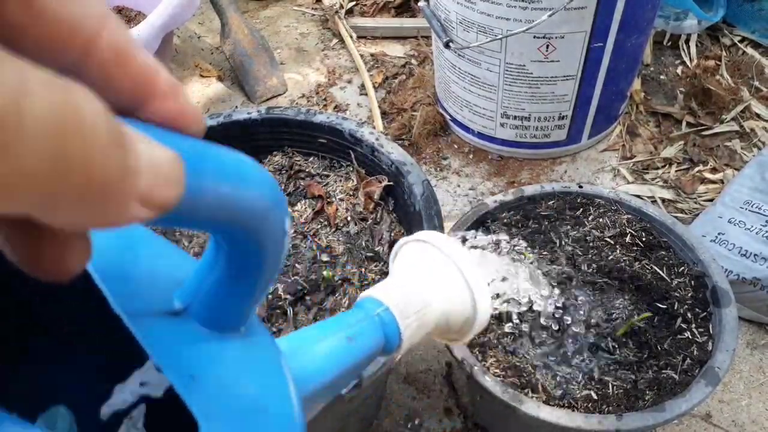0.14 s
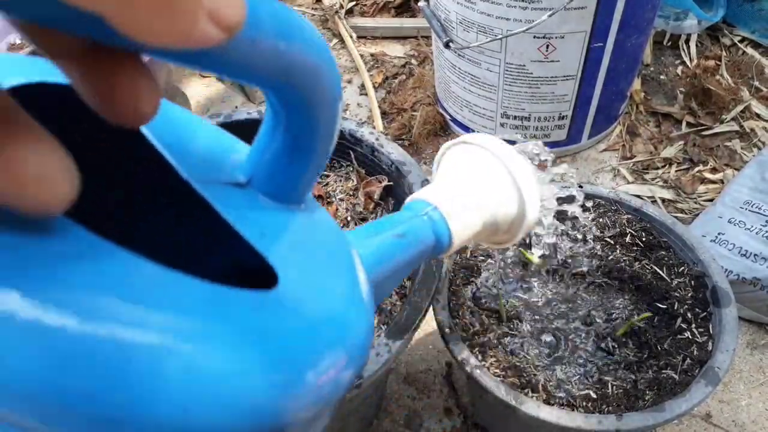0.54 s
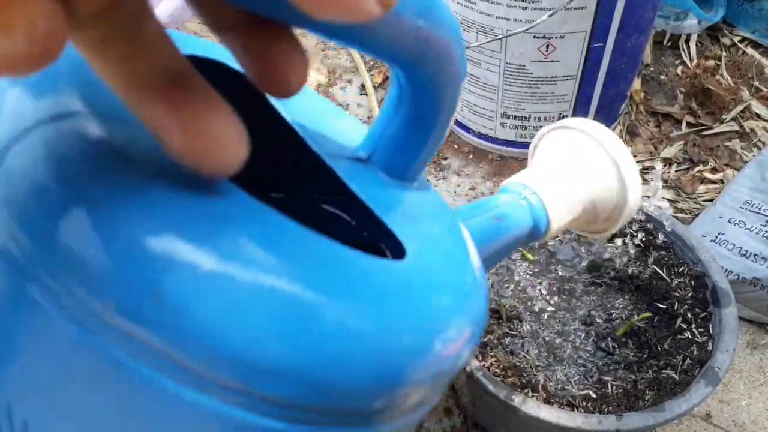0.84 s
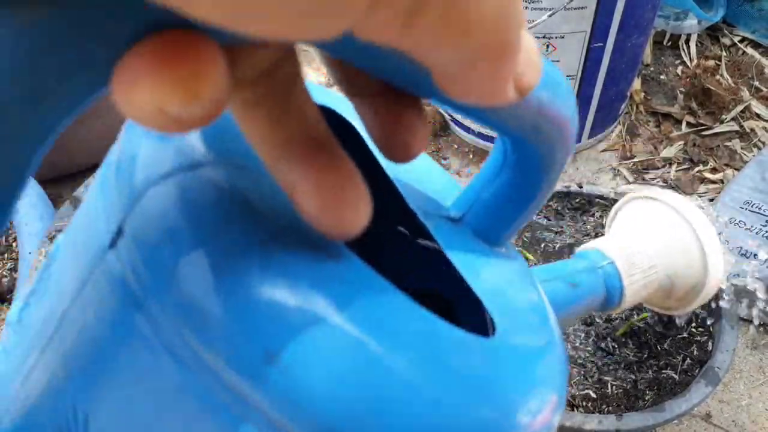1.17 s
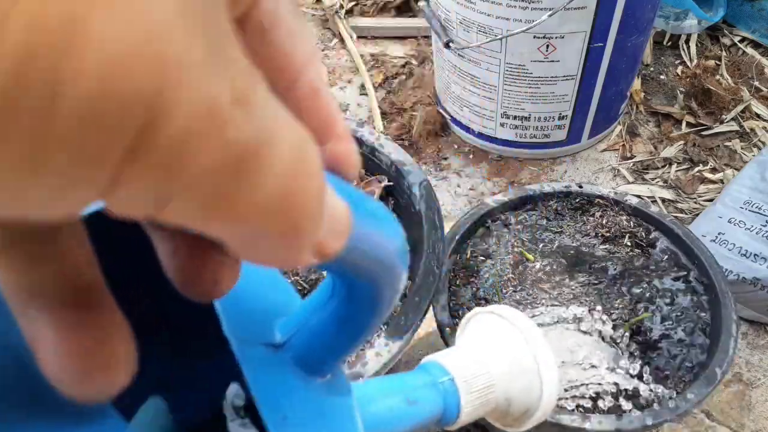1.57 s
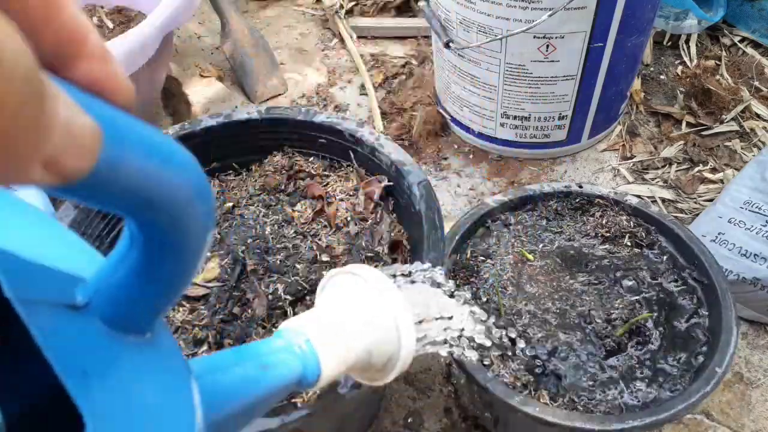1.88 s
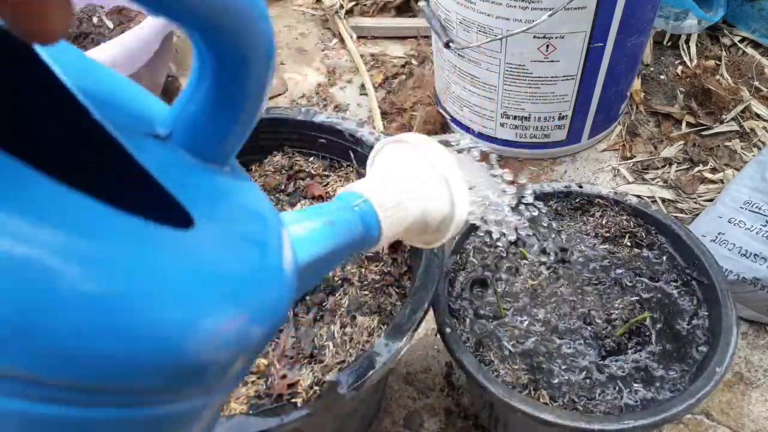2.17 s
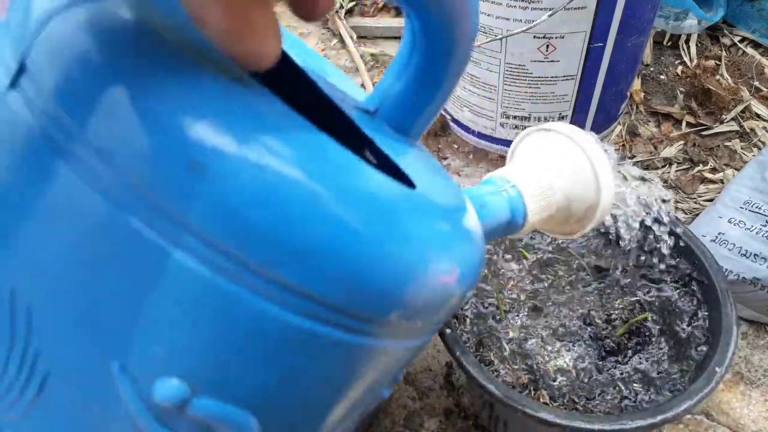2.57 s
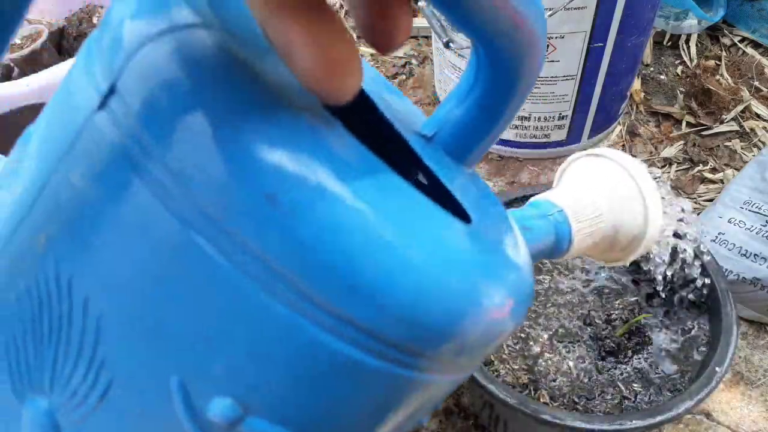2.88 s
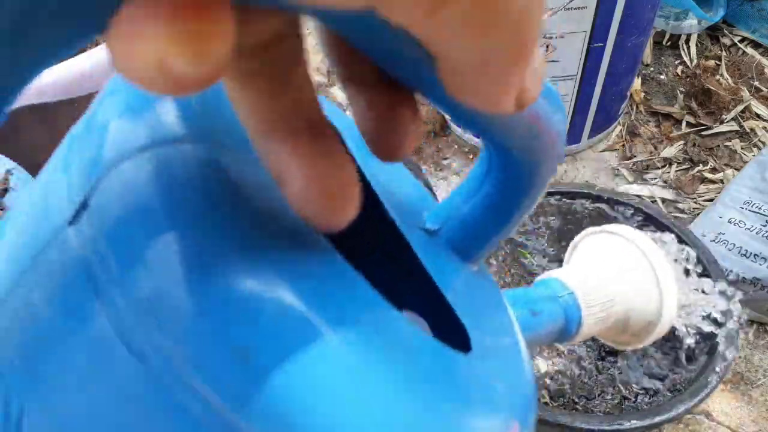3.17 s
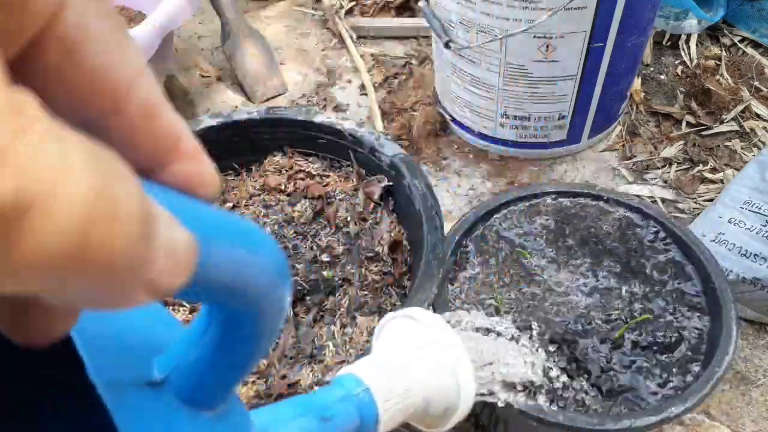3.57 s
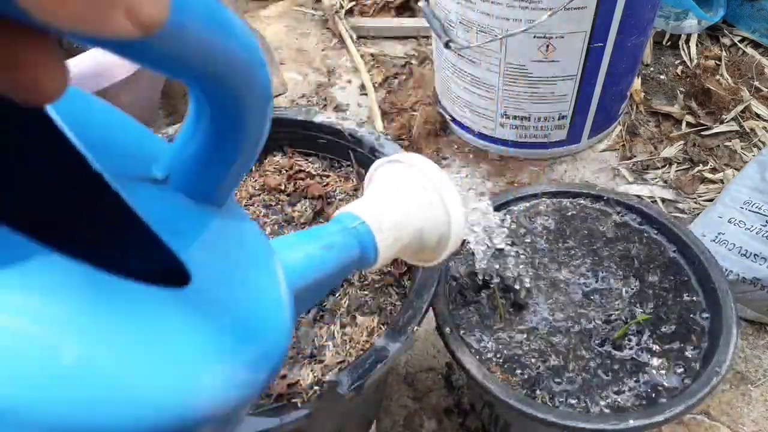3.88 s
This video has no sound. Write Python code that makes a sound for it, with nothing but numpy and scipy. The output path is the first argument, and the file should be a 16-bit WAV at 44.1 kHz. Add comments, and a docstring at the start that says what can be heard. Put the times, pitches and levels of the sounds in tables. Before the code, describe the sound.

Close outdoor sprinkling of water into a pot of soaked earth, with crisp spatter, tinkling bubbles, soft gurgles and faint low thuds.

```python
"""Watering a pot of soaked soil

A plastic watering can is swung slowly to and fro, sprinkling a pot of wet soil outdoors, close by.
Drops from the rose slap the soil as short noisy cracks and trap bubbles, which ring as short sine tones.
The pot adds faint resonances, and a short reflection off the moving can sweeps the colour of the spray.
Low thuds, a thin scattered tail and a quiet open-air noise lie underneath."""
import sys
import numpy as np
from scipy import signal
from scipy.fft import rfft, irfft
from scipy.io import wavfile
from scipy.ndimage import uniform_filter1d, map_coordinates

SR = 44100
rng = np.random.default_rng(int(sys.argv[2]) if len(sys.argv) > 2 else 0)


def file_out(sig):
    """Save sig as 16-bit WAV at sys.argv[1]."""
    # one column per channel
    cols = np.atleast_2d(sig).T
    # limit, then scale
    lim = np.clip(cols, -1, 1)
    pcm = np.round(lim * 32767).astype(np.int16)
    wavfile.write(sys.argv[1], SR, pcm)


N = 177919
TIME = np.arange(N) / SR


def from_db(db):
    """Turns decibels into a gain."""
    return 10 ** (np.asarray(db) / 20)


def unit(x):
    """Scales a sound to an rms of 1."""
    return x / np.sqrt(np.mean(x ** 2) + 1e-20)


def curve(table):
    """Reads a time table at every sample, with straight lines between its points."""
    return np.interp(TIME, *np.transpose(table))


def at_pitch(points, hz):
    """Reads a spectrum in dB on a log-frequency axis."""
    point_hz, db = np.transpose(points)
    return np.interp(np.log(hz + 1), np.log(point_hz), db)


def coloured(x, points):
    """Gives a sound a spectrum; the filter never acts ahead of time, so clicks keep their sharp fronts."""
    size = 2048
    gain = from_db(at_pitch(points, abs(np.fft.fftfreq(size, 1 / SR))))
    minimum_phase = np.exp(np.conj(signal.hilbert(np.log(gain))))
    taps = np.fft.ifft(minimum_phase).real
    return signal.oaconvolve(x, taps)[:len(x)]


def add(mix, s, sound):
    """Mixes a sound in at a time in seconds."""
    part = mix[max(round(s * SR), 0):][:len(sound)]
    part += sound[:len(part)]


def wander(lasts_s):
    """A smooth random drift of rms 1: noise averaged twice over a short time."""
    width = max(int(lasts_s * SR), 2)
    return unit(uniform_filter1d(uniform_filter1d(rng.standard_normal(N), width), width))


def hump(count, peak_at):
    """Envelope of a wet contact: a quick swell, then a fade; peak_at is a share of its length."""
    skew = np.log(.5) / np.log(np.clip(peak_at, .02, .5))
    return np.sin(np.pi * np.linspace(0, 1, count) ** skew) ** 2


# how hard the water lands; each layer follows it by its own amount: (time [s], level [dB])
POUR_LEVEL = [(0.0, -51), (0.14, -46), (0.79, -41), (0.95, -44.5), (0.98, -48.5), (1.06, -47),
              (1.11, -50.5), (1.35, -50), (1.43, -44), (1.62, -46), (1.68, -50.5), (1.9, -38.5),
              (1.94, -50.5), (2.02, -47.5), (2.26, -37.5), (2.32, -43), (2.45, -40), (2.67, -42.5),
              (3.09, -36.5), (3.76, -43.5), (3.8, -50.5), (3.875, -50.5), (3.91, -45), (4.03, -45.5)]


def pour_db():
    """The strength of the pour at every sample, in dB."""
    return curve(POUR_LEVEL)


# the soil soaks through and water begins to stand on it
SOAKED_AT_S, SOAKING_S = 2.1, 0.67


def level(db, follows, soaked_db):
    """Gain of a layer: it follows the pour by its own amount and changes as the soil soaks through."""
    pour = pour_db()
    soaked = .5 + .5 * np.tanh((TIME - SOAKED_AT_S) / SOAKING_S)
    return from_db(db + pour.mean() + follows * (pour - pour.mean()) + soaked_db * soaked)


# turning points of the swinging can: (time [s], lag of its reflection [ms])
CAN_SWING = [(0, 0.44), (.6, 0.458), (1.52, 0.362), (2.2, 0.475), (2.95, 0.39), (3.3, 0.388), (3.92, 0.487)]


def swing(t):
    """The can eases from one turning point to the next; gives the lag of its reflection in ms."""
    turn_s, lag_ms = np.transpose(CAN_SWING)
    turns = np.arange(len(turn_s))
    leg, part = np.divmod(np.interp(t, turn_s, turns), 1)
    eased = leg + np.sin(np.pi * part / 2) ** 2
    return np.interp(eased, turns, lag_ms)


def reach():
    """How far forward the can is swung, from about -1 to 1: a short lag means far forward."""
    lag = swing(TIME)
    return (lag.mean() - lag) / (np.ptp(lag) / 2)


# the can rises after each swing back; the rise is heard in full at a share of 1
LIFT_AFTER_S, LIFT_DB_PER_MS = 0.26, 70


def plunge(share):
    """Gain of the deep sounds: drops from higher up plunge deeper, so these swell with the can held high."""
    lift = swing(TIME - LIFT_AFTER_S)
    return from_db(share * LIFT_DB_PER_MS * (lift - lift.mean()))


def bunching(lasts_s=0.0034, depth_db=6.5):
    """The jets break up in bunches: a gain that flutters over some milliseconds."""
    return from_db(depth_db * np.clip(wander(lasts_s), -2.5, 1.5))


def ping(hz, length, rise, peak_at=0.34):
    """A trapped bubble swells and is choked by the mud, its pitch rising as it nears the surface."""
    t = np.arange(int(SR * length) + 4) / SR
    turns = hz * (t + rise * t ** 2 / (2 * length))
    return np.sin(2 * np.pi * turns) * hump(len(t), peak_at)


def slap(length, hz, octaves):
    """A drop flattens and tears: a burst of tiny cracks, strongest around a pitch set by its size."""
    size = 512
    count = min(int(SR * length) + 4, size - 64)
    cracks = rng.standard_normal(count) * rng.random(count) * hump(count, peak_at=0.18)
    away = np.log2((np.fft.rfftfreq(size, 1 / SR) + 50) / hz) / octaves
    burst = irfft(rfft(np.pad(cracks, (16, 0)), size) / np.sqrt(1 + away ** 4))
    return burst / np.linalg.norm(burst)


def shower(grains, bunches, per_s, spread_db, steady_s, thinning=0.4):
    """Scatters drop sounds at random times and sizes; a weak pour thins out into separate drops."""
    chance, size, kind = rng.random((3, N))
    flow = from_db(pour_db()) ** (2 * thinning)
    falls = chance < per_s / SR * flow / flow.mean()
    # many small drops and a few large ones, up to a limit
    size_db = spread_db * np.minimum(-np.log(size + 1e-12), 3)
    sizes = from_db(size_db) * falls * bunches
    out = np.zeros(N)
    for i in np.flatnonzero(sizes):
        add(out, i / SR, sizes[i] * grains[int(kind[i] * len(grains))])
    # the water arrives evenly, so the running mean power is held near 1
    width = int(steady_s * SR)
    power = uniform_filter1d(uniform_filter1d(out ** 2, width), width)
    return out / np.sqrt(abs(power) + 1e-9)


# colour of the open-air background: (frequency [Hz], relative level [dB per Hz])
OUTDOORS_SPECTRUM = [(20, -30), (40, -14), (65, -2), (125, 2), (200, -3.5), (400, -1.5), (1000, -10),
                     (4000, -57), (16000, -49)]


def outdoors():
    """Quiet open-air background: shaped noise, almost the same in both ears."""
    middle = unit(coloured(rng.standard_normal(N), OUTDOORS_SPECTRUM))
    side = unit(coloured(rng.standard_normal(N), OUTDOORS_SPECTRUM))
    return from_db(-63.0) * (middle + from_db(-21.5) * np.array([side, -side]))


def yard(x, t60, wet_db):
    """Pots, bucket and ground scatter a short, thin tail, a different one for each spot the water hits."""
    size = 512
    t = np.arange(SR // 16) / SR
    window = np.sin(np.pi * np.arange(size) / size)
    fade = (t > .001) * np.exp(-np.log(1000) * t / t60)
    tail = np.zeros(N)
    # overlapping slices of the sound, each with its own tail
    for i in range(0, N - size, size // 2):
        taps = rng.standard_normal(len(t)) * fade
        add(tail, i / SR, signal.fftconvolve(x[i:i + size] * window, taps / np.linalg.norm(taps)))
    return x + from_db(wet_db) * tail


# colour of the thuds in the soil: (frequency [Hz], relative level [dB per Hz])
DRUM_SPECTRUM = [(40, -39), (90, -15), (130, 4), (220, 4), (290, 4.5), (400, -11.5), (800, -10.5),
                 (2000, -9)]


def drumming():
    """The weight of many drops thuds into the soil: random clicks shaped into low thuds."""
    clicks = rng.standard_normal(N) * (rng.random(N) < 600 / SR)  # about 600 per second
    thuds = unit(coloured(clicks, DRUM_SPECTRUM))
    return level(db=-15.0, follows=0.63, soaked_db=4.0) * plunge(share=0.19) * thuds


# relative loudness of a bubble of each pitch: (pitch [Hz], level [dB])
BUBBLE_LOUDNESS = [(700, -2.5), (850, -10), (1100, 2), (1500, -0.5), (2300, -2), (3100, 0), (3800, -3.5),
                   (4500, 2)]


def bubbles(bunches, lowest_hz, highest_hz, ring_cycles, splash, per_s, spread_db, count=120):
    """Drops that land in standing water: a splash and a short bubble tone an octave lower."""
    grains = []
    for pitch, length in rng.random((count, 2)):
        hz = lowest_hz * (highest_hz / lowest_hz) ** pitch
        cycles = ring_cycles * (.5 + 2 * length ** 2)
        ring = ping(hz, cycles / hz, rise=0.23)
        grain = np.zeros(SR // 30)
        add(grain, 0, ring / np.linalg.norm(ring))
        add(grain, 0, splash * slap(length=0.0048, hz=2 * hz, octaves=1.0))
        grains.append(from_db(at_pitch(BUBBLE_LOUDNESS, hz)) * grain)
    return shower(grains, bunches, per_s, spread_db, steady_s=0.065)


def puddles(bunches):
    """Small bubbles tinkle where the water is shallow; large ones gurgle where it pools."""
    small = bubbles(bunches, 1650, 4810, ring_cycles=11, splash=0.65, per_s=1300, spread_db=4.4)
    large = bubbles(bunches, 620, 2400, ring_cycles=4.4, splash=0.75, per_s=900, spread_db=3.8)
    tinkle = level(db=-9.0, follows=0.84, soaked_db=2.0) * small
    gurgle = level(db=-12.5, follows=0.72, soaked_db=0.5) * plunge(share=0.85) * large
    return tinkle + gurgle


# the cavity of a plop breaks up into smaller bubbles: how long, how loud, range of their pitches
GURGLE_S, GURGLE_DB, GURGLE_OCTAVES = 0.016, -21, 1.48
# fat drops that plunge into a puddle; each part of the sound has its own offset from the level:
# (time [s], level [dB], starting pitch of the trapped bubble [Hz], length of its ring [cycles])
PLUNGING_DROPS = [(0.118, -35.5, 705, 4.3), (0.139, -39, 835, 24), (0.1664, -37.5, 774, 11),
                  (0.176, -33, 1550, 6.8), (0.198, -46, 790, 8), (0.2144, -34, 790, 9.9),
                  (0.2422, -40, 930, 5.1), (0.297, -44, 352, 6.5), (0.297, -29.5, 790, 1.2),
                  (0.3489, -25.5, 1880, 5.3), (0.695, -23.5, 1520, 2.6), (0.807, -31, 1750, 6.7),
                  (0.854, -29.5, 1510, 8.4), (0.93, -35.5, 1110, 6.3), (1.116, -34.5, 2230, 17),
                  (1.212, -32, 857, 5.1), (1.407, -27.5, 2740, 7.9), (1.4198, -33.5, 1920, 20),
                  (1.556, -34, 1480, 18), (2.122, -36, 1180, 7.3), (2.1314, -29.5, 1060, 2.3),
                  (2.242, -29.5, 2450, 9.7), (2.32, -35, 760, 3.3), (2.405, -33, 1830, 11),
                  (2.439, -34, 2160, 12), (2.472, -29, 2550, 12), (2.524, -26.5, 960, 3.7),
                  (2.545, -22, 1540, 3.3), (2.567, -29.5, 1760, 6.4), (2.633, -31, 1790, 5.1),
                  (2.739, -32, 1440, 5.9), (2.771, -29.5, 1400, 5), (2.871, -32.5, 1480, 4.8),
                  (2.9442, -27.5, 2360, 3), (2.991, -22.5, 2330, 9.2), (3.061, -29.5, 840, 2.9),
                  (3.086, -26, 2250, 7.6), (3.143, -29.5, 1440, 13), (3.2592, -32, 810, 2.9),
                  (3.297, -37, 776, 5.4), (3.345, -26.5, 2100, 7), (3.351, -25.5, 2020, 4.8),
                  (3.521, -29, 2740, 12), (3.581, -32.5, 2800, 9.1), (3.6435, -28.5, 2200, 8.4),
                  (3.703, -38, 830, 14), (3.781, -25.5, 2250, 3.6), (3.83, -29, 2370, 3.7),
                  (3.959, -35, 2070, 11)]


def plops(ring_db=-2.5, splash_db=0.0, count=4):
    """Fat drops plunge in: a rough splash, the blip of a large bubble, then a gurgle of smaller ones."""
    out = np.zeros(N)
    for s, db, hz, cycles in PLUNGING_DROPS:
        add(out, s, from_db(db + ring_db) * ping(hz, cycles / hz, rise=0.054, peak_at=0.12))
        add(out, s - .0003, from_db(db + splash_db) * slap(length=0.0055, hz=1.6 * hz, octaves=1.0))
        for when, pitch, size in rng.random((count, 3)):
            small_hz = hz * 2 ** (GURGLE_OCTAVES * (pitch - .25))
            small = (.5 + size) * ping(small_hz, 7 / small_hz, rise=0.076)
            add(out, s + GURGLE_S * when, from_db(db + GURGLE_DB) * small)
    return out


# band of the crack of a 10 kHz snap; larger, lower drops crack more broadly by this power of pitch
SNAP_BREADTH_OCTAVES, BREADTH_GROWS = 0.28, 0.3
# single drops that snap on the wet soil; each part of the sound has its own offset from the level:
# (time [s], level [dB], pitch [Hz], length of the ring [ms])
SNAPPING_DROPS = [(0.018, -37, 6800, 3.2), (0.0784, -25, 8760, 2.1), (0.0855, -33.5, 3120, 4.5),
                  (0.095, -31, 5600, 2.3), (0.1364, -29, 4900, 4.8), (0.142, -26, 4740, 4.1),
                  (0.175, -22, 5400, 0.72), (0.1933, -23.5, 11600, 3.8), (0.2146, -25, 2720, 1.8),
                  (0.257, -24, 4160, 2.1), (0.272, -33, 3040, 3.1), (0.32, -17.5, 10400, 1.3),
                  (0.317, -30, 3040, 6.4), (0.349, -25, 4730, 2.8), (0.3594, -20, 6700, 3),
                  (0.5008, -24.5, 6700, 1.3), (0.6404, -23, 10600, 2.6), (0.6953, -25, 6740, 2.2),
                  (0.7238, -37, 5870, 2), (0.733, -16.5, 10300, 3.8), (0.7597, -19, 9200, 2.2),
                  (0.7668, -23, 9000, 4.9), (0.7876, -24, 10700, 2.4), (0.823, -23, 9140, 3.1),
                  (0.9061, -23, 6900, 4), (0.932, -23, 6960, 2.1), (0.9391, -24.5, 5040, 1.7),
                  (1.0568, -18.5, 5400, 1.5), (1.077, -28, 6960, 4.7), (1.1565, -26, 3170, 3.2),
                  (1.2093, -25.5, 5300, 1.8), (1.3939, -24, 12000, 1.2), (1.4193, -29, 11000, 1.3),
                  (1.471, -30.5, 3230, 7), (1.482, -35, 3280, 4.5), (1.52, -26, 3180, 3),
                  (1.5257, -24, 10460, 2.4), (1.599, -25.5, 10150, 4.1), (1.626, -23.5, 6050, 2.4),
                  (1.7292, -26.5, 5530, 2.6), (1.792, -30, 5900, 3.9), (1.9146, -22, 8500, 2.3),
                  (1.964, -32, 7200, 2.7), (2.108, -26, 6200, 5.9), (2.164, -24.5, 6300, 3.8),
                  (2.244, -20, 6350, 3.4), (2.36, -26, 10970, 6), (2.454, -19, 7600, 0.6),
                  (2.491, -25, 5600, 1.9), (2.7387, -24, 3310, 4.2), (2.817, -30, 3380, 3.4),
                  (3.013, -23.5, 10650, 2.9), (3.0421, -21.5, 4730, 3), (3.116, -18, 8100, 1.5),
                  (3.239, -23, 9800, 2.4), (3.2512, -10.5, 10600, 1.8), (3.249, -32, 3280, 4.9),
                  (3.305, -26.5, 3100, 6.5), (3.324, -22.5, 5500, 2.8), (3.3409, -20.5, 8600, 1.9),
                  (3.42, -26.5, 3170, 4.7), (3.478, -29.5, 3120, 9.9), (3.4978, -26, 4980, 2.1),
                  (3.538, -25, 3010, 3.7), (3.6074, -22, 9000, 1), (3.6666, -20, 2870, 2.8),
                  (3.7425, -27, 6600, 3.2), (3.782, -23, 2940, 0.93), (3.8298, -32, 10200, 3.1),
                  (3.902, -22.5, 10340, 4.1), (3.928, -31, 4320, 2.4), (3.953, -30.5, 9900, 1)]


def snaps(ring_db=-4.0, crack_db=3.0, splash_db=-0.5, tick_db=-2.0):
    """Single drops crack on the soil and ring a tiny bubble; a tick and wide splash sound pot and can."""
    out, wide = np.zeros((2, N))
    for s, db, hz, ms in SNAPPING_DROPS:
        length = ms / 1000
        breadth = SNAP_BREADTH_OCTAVES * (10000 / hz) ** BREADTH_GROWS
        start = s - .0004  # the impact comes just before the ring
        add(out, s, from_db(db + ring_db) * ping(hz, length, rise=0.02, peak_at=0.16))
        add(out, start, from_db(db + crack_db) * slap(length=0.55 * length, hz=hz, octaves=breadth))
        add(wide, start, from_db(db + splash_db) * slap(length=length, hz=6900, octaves=1.63))
        add(wide, start, from_db(db + tick_db) * slap(length=0.0001, hz=8500, octaves=1.0))
    return out + can_reflection(pot(wide))


def resonate(x, hz, width):
    """A resonance of gain 1 at its centre, which follows a pitch curve."""
    turn = np.exp(2j * np.pi * np.cumsum(hz) / SR)
    r = np.exp(-np.pi * width / SR)
    # shift the pitch down to zero, smooth, and shift it back up
    return 2 * (turn * signal.lfilter([1 - r], [1, -r], x / turn)).real


# resonances of the pot and the hollow between it and the can: (middle pitch [Hz], width [Hz],
# level over the direct sound [dB], change with the can swung forward [dB], rise in pitch then [share])
POT_RESONANCES = [(842, 61, 5.5, 1, 0.014), (1482, 155, 3, 4, 0.06), (2246, 94, -1, 9.5, 0.017),
                  (3144, 165, 7, 4.5, 0.028), (4060, 83, 1, -8.5, 0.017), (6900, 160, -21.5, -0.5, 0.075)]


def pot(x, stray_hz=60, stray_s=0.025):
    """The pot adds short resonances that stray with the landing spot and shift as the spray moves across."""
    forward = reach()
    out = x.copy()
    for hz, width, db, forward_db, rise in POT_RESONANCES:
        pitch = hz * (1 + rise * forward) + stray_hz * wander(stray_s)
        out += from_db(db + forward_db * forward) * resonate(x, pitch, width)
    return out


# change of the reflections with the can swung forward
ECHO_FORWARD_DB = -3.5
# reflections off the can, at the middle of its swing: (time after the first [ms], strength [gain])
CAN_REFLECTIONS = [(0.0, 0.3), (0.51, -0.075)]


def can_reflection(x, edge_ms=0.058, scatter_ms=0.003):
    """The can's curved front reflects treble a moment late: a comb that sweeps, deepest with it drawn back."""
    lag_ms = swing(TIME) + scatter_ms * wander(0.0125)
    facing = from_db(ECHO_FORWARD_DB * reach())
    out = x.copy()
    for later_ms, strength in CAN_REFLECTIONS:
        arrival = (TIME - (lag_ms + later_ms) / 1000) * SR
        front = map_coordinates(x, [arrival], order=3)
        back = map_coordinates(x, [arrival - edge_ms / 1000 * SR], order=3)
        # taking away a slightly later copy leaves mostly treble
        out += facing * strength * (front - back)
    return out


# colour of the spray on wet soil: (frequency [Hz], relative level [dB per Hz])
SLAP_SPECTRUM = [(200, -35), (900, -6), (2000, -7), (3000, -9), (3800, -7.5), (4900, -2.5), (6500, 0.5),
                 (7400, 0), (7950, -5), (8600, 2), (10700, 1), (12000, -2), (14000, -5), (16000, -7)]


def spray(bunches, count=200, ring_share=1.0, ring_cycles=12):
    """Drops slap the wet soil, each tinted by a tiny bubble of its own, over a mist of fine droplets."""
    grains = []
    for pitch, length, tint in rng.random((count, 3)):
        hz = 3800 + 8000 * pitch
        stretch = .5 + 2 * length
        ring = ping(hz, ring_cycles * stretch / hz, rise=0.0066)
        grain = slap(length=0.0016 * stretch, hz=hz, octaves=0.55)
        add(grain, 0, ring_share * tint * ring / np.linalg.norm(ring))
        grains.append(grain / np.linalg.norm(grain))
    drops = shower(grains, bunches, per_s=720, spread_db=4.4, steady_s=.045)
    # the mist flutters half as deeply, in dB
    mist = from_db(-6.0) * shower(grains, np.sqrt(bunches), per_s=3500, spread_db=3.2, steady_s=.04)
    return level(db=0.63, follows=0.63, soaked_db=-1.5) * unit(coloured(drops + mist, SLAP_SPECTRUM))


def scene():
    """The water sounds from straight ahead, over the open-air background."""
    bunches = bunching()  # shared by the spray and the puddles
    sprinkle = from_db(-3.5) * pot(spray(bunches) + puddles(bunches))
    water = can_reflection(sprinkle) + snaps() + plops()
    return yard(water, t60=0.038, wet_db=-12.5) + drumming() + outdoors()


def record(dry, low_cut_hz=34, edge_hz=15750):
    """Cuts the deepest rumble below, and the recorder's band limit ends the treble."""
    low_cut = signal.butter(2, low_cut_hz, "high", fs=SR, output="sos")
    lean = signal.sosfilt(low_cut, dry)
    band_limit = signal.firwin(401, edge_hz, window=("kaiser", 8), fs=SR)
    return signal.oaconvolve(lean, band_limit[None], "same")


dry = scene()
out = record(dry)
file_out(out)
```